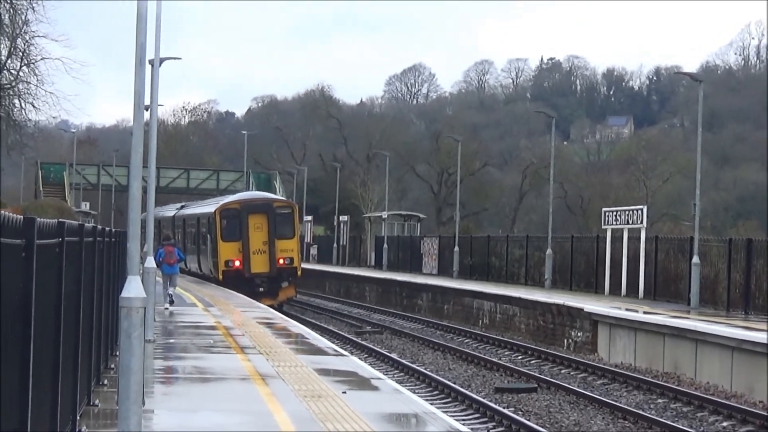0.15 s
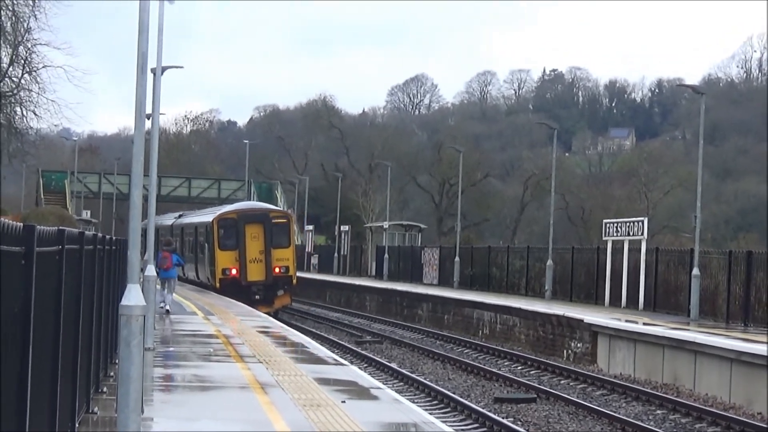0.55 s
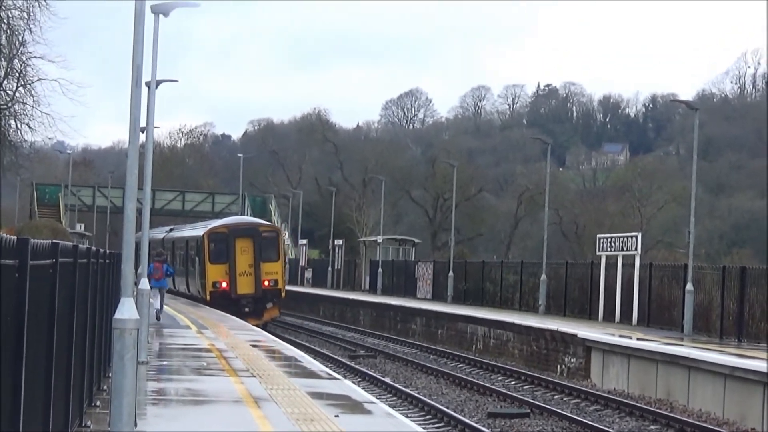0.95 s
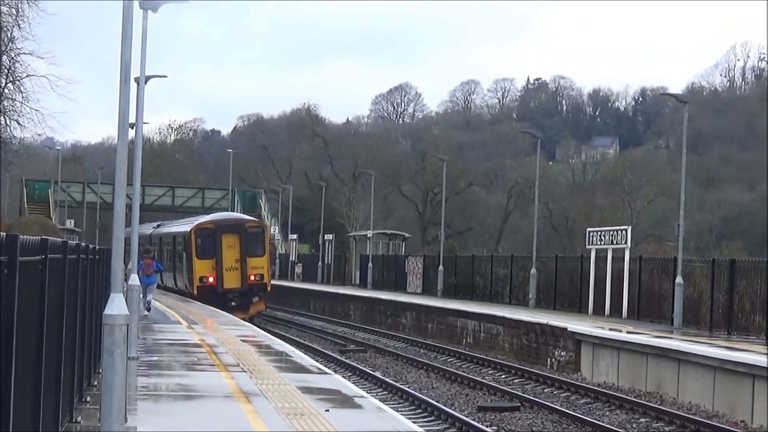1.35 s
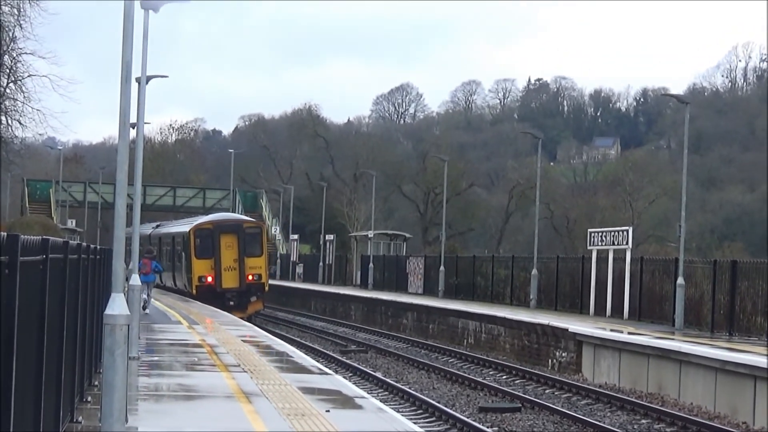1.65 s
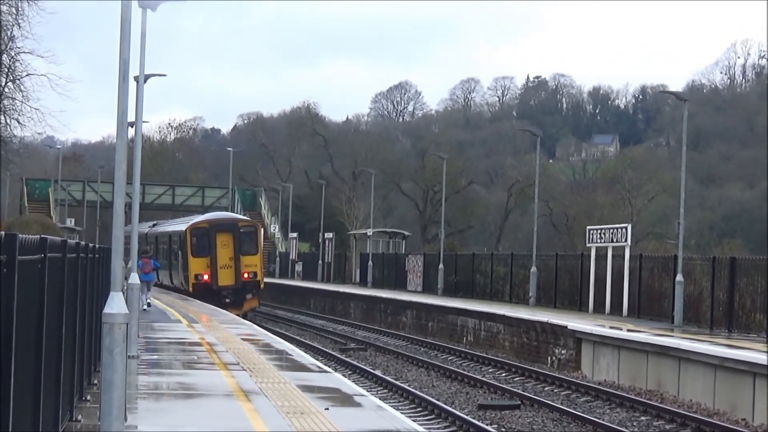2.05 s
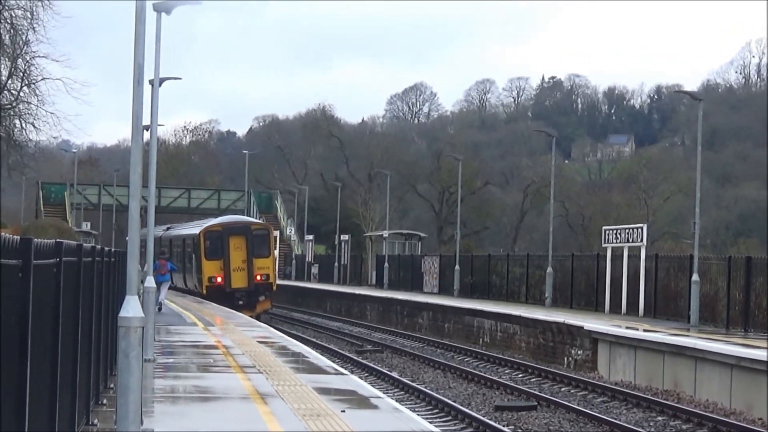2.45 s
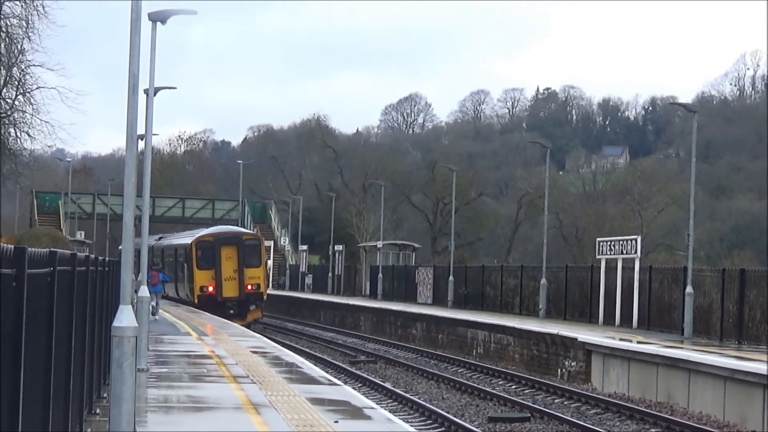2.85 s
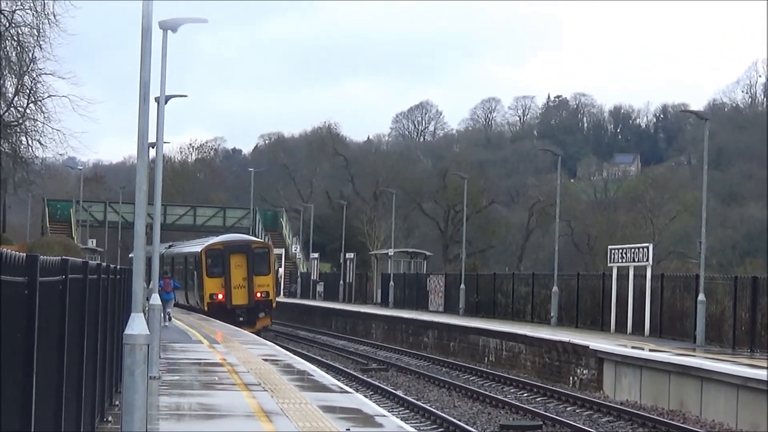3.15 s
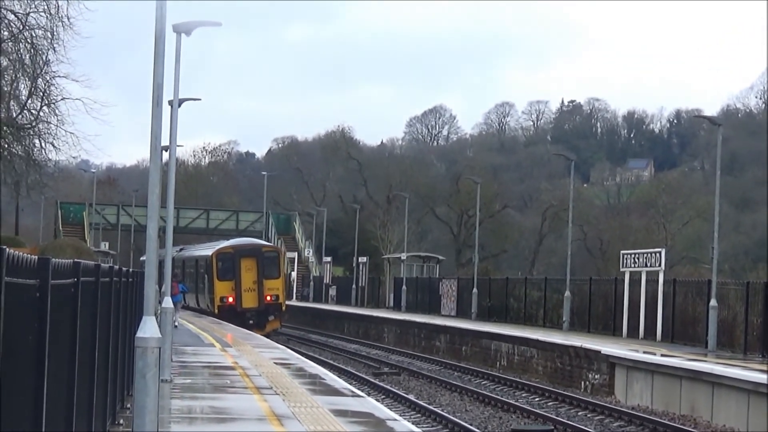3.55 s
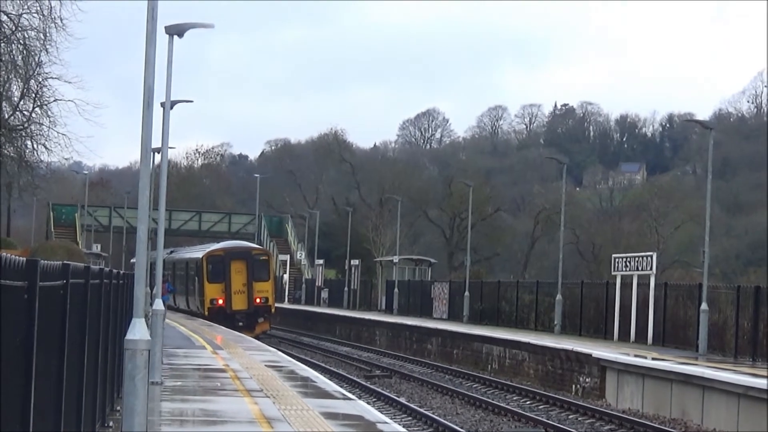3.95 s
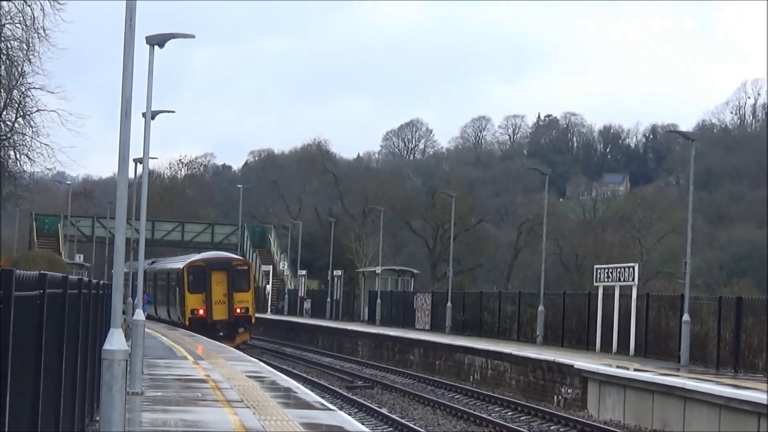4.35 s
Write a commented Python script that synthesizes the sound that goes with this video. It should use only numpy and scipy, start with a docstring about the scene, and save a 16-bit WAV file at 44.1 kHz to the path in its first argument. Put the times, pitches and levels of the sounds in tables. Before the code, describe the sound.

Shrill, wavering train wheel squeals and rough, stuttering brake grinding ring out over a dull rolling rush, with a few close drips.

```python
"""A diesel train's wheels squeal as it brakes along a curved, wet platform, some way ahead of the microphone.
Friction holds three long squeals while other wheel modes catch, swell and ring down. The brakes bite
again and again: each bite chatters, grinds and roughens the long squeals. Behind them is the dull rush of
the running train; close to the stereo microphone, a few drops and soft steps."""
import sys
import numpy as np
from scipy import signal
from scipy.fft import rfft, irfft, next_fast_len
from scipy.io import wavfile
from scipy.ndimage import uniform_filter1d, minimum_filter1d, map_coordinates

SR = 44100
rng = np.random.default_rng(int(sys.argv[2]) if len(sys.argv) > 2 else 0)


def wav_record(signal):
    """Record a signal, one row per channel, as 16-bit PCM in the file named by sys.argv[1]."""
    frames = np.transpose(np.atleast_2d(signal))
    bounded = np.clip(frames, -1, 1)
    # unit amplitude maps onto the largest positive 16-bit level
    quanta = np.round(bounded * 32767).astype(np.int16)
    wavfile.write(sys.argv[1], SR, quanta)


N = 198273

# Contours of the long squeals down the platform: (time [s], level [dB])
MAIN_LEVEL = [(1.2, -60), (1.43, -33.5), (1.83, -19), (1.85, -24), (2.34, -23.5), (2.36, -20.5),
              (2.89, -19), (3.27, -44.5), (3.49, -27), (3.99, -26.5), (4.03, -20), (4.14, -26.5),
              (4.19, -16.5), (4.3, -28.5), (4.36, -17), (4.5, -27.5)]
SHRILL_LEVEL = [(0.7, -55), (0.95, -39), (1.29, -47), (1.53, -38), (2.41, -23.5), (2.55, -13), (2.74, -19),
                (2.77, -14), (2.97, -23), (3.4, -6.5), (3.46, -8), (3.64, -32), (3.8, -34), (3.98, -37),
                (4.01, -31), (4.32, -40), (4.39, -23), (4.5, -30)]
WHISTLE_LEVELS = [
    [(0.45, -62), (0.59, -32), (0.74, -24), (0.93, -30), (1.39, -23.5), (2.5, -31.5), (2.64, -37.5),
     (2.86, -33), (3.28, -43), (3.4, -59)],
    [(3.65, -67), (3.896, -39), (3.946, -48), (4.02, -31.5), (4.176, -32), (4.218, -23), (4.276, -31),
     (4.388, -22), (4.464, -34), (4.496, -31)],
]  # two contours: the whistle sounds twice
# Their slow drift: (time [s], pitch [Hz])
MAIN_DRIFT = [(1.35, 5275), (1.6, 5232), (1.8, 5222), (2.3, 5265), (2.5, 5242), (2.9, 5238), (3.3, 5295),
              (3.6, 5265), (4.5, 5256)]
SHRILL_DRIFT = [(1.95, 10284), (2.55, 10299), (3.15, 10312), (3.4, 10313), (3.8, 10324)]
TWIN_DRIFT = [(0.8, 14361), (1.9, 14369), (4.3, 14428)]  # the lower tone of the whistle
def long_squeals(grind):
    """Friction holds wheel modes singing. Grinding roughens the lower two; the highest is a close pair."""
    rough = grind ** 2 / (grind ** 2 + amp(-45) ** 2)  # half rough at -45 dB of grinding
    main = amp(2.06 + 1.54 * wobble(20))
    main *= sing(curve(MAIN_DRIFT), flutter=.5 + .24 * rough, width_hz=36.5, skirt_hz=231)
    shrill = amp(1.5 + .5 * wobble(12))
    shrill *= sing(curve(SHRILL_DRIFT), flutter=.12 + .38 * rough, width_hz=55, skirt_hz=170)
    whistle = amp(.5 + 2.5 * wobble(18)) * sing(14493, flutter=.21, width_hz=40, skirt_hz=180)
    twin = amp(-5 + 2.2 * wobble(15)) * sing(curve(TWIN_DRIFT), flutter=.38, width_hz=40, skirt_hz=180)
    pair = sum(map(loudness, WHISTLE_LEVELS)) * (whistle + twin)
    return loudness(MAIN_LEVEL) * main + loudness(SHRILL_LEVEL) * shrill + pair


# Wheel modes that come and go on the curve: name -> (pitch [Hz], flutter [0-1], width [Hz])
WHEEL_MODES = { "hoot": (1330, .6, 29), "rub": (1780, .95, 230), "growl": (2440, .6, 29),
               "bray": (2830, .6, 29), "moan": (3095, .52, 38), "upper moan": (3300, .9, 45),
               "rasp": (3830, 1, 70), "low ring": (4090, .65, 25), "yelp": (5995, .7, 40),
               "flare": (6220, 1, 120), "chirp": (7078, .65, 32), "ring": (7962, .65, 45),
               "mid ring": (8410, .9, 30), "high ring": (9148, .85, 25), "high twin": (9348, .9, 25),
               "sizzle": (10490, .95, 35), "low zing": (11272, .8, 40), "zing": (11365, .4, 25),
               "top ring": (15502, .3, 20)}
# Friction catches one: (mode name, time at full level [s], hold [s], level [dB], growth [dB/s])
MODE_CATCHES = [ ("ring", 0.0, 0.051, -32, 200), ("ring", .17, 0.067, -38, 180), ("moan", .05, .5, -53, 50),
                ("chirp", 0.47, .05, -35, 100), ("chirp", 0.5, 0.076, -23, 350),
                ("mid ring", .48, 0.59, -42.5, 200), ("moan", 0.665, 0.058, -37, 800),
                ("upper moan", 0.708, .07, -33.5, 300), ("zing", 0.6, .05, -39, 320),
                ("zing", 0.743, 0.032, -21.5, 270), ("hoot", 0.836, 0.027, -47, 500),
                ("mid ring", 0.908, 0.053, -24, 330), ("zing", 0.904, .03, -24, 400),
                ("moan", 0.91, 0.025, -22, 250), ("low zing", 0.934, .04, -22.5, 180),
                ("ring", 0.95, 0.045, -27, 150), ("bray", 1.05, .03, -40.5, 900),
                ("rub", 1.095, .01, -39, 900), ("rub", 1.31, 0.13, -42.5, 25),
                ("high ring", 1.62, 1.35, -30.5, 95), ("high twin", 1.61, 0.037, -30, 120),
                ("sizzle", 1.67, .55, -33.5, 70), ("mid ring", 1.69, 1.32, -39, 140),
                ("low zing", 1.8, .35, -43, 100), ("sizzle", 2.34, 0.57, -23, 40),
                ("high twin", 2.59, 0.43, -28.5, 22), ("rasp", 2.55, 0.45, -38, 23),
                ("low ring", 2.56, 0.2, -30, 147), ("low zing", 2.545, 0.17, -38, 75),
                ("low ring", 2.785, 0.58, -36.5, 42), ("sizzle", 2.98, 0.089, -30.5, 53),
                ("flare", 3.16, .15, -43, 80), ("flare", 3.6, 0.0096, -32.5, 700),
                ("ring", 3.325, .01, -34.5, 730), ("rasp", 3.32, 0.0091, -38.5, 500),
                ("sizzle", 3.1, 0.14, -23, 400), ("high twin", 3.43, .06, -33, 300),
                ("sizzle", 3.72, 0.11, -28.5, 100), ("chirp", 3.9, 0.074, -27.5, 82),
                ("sizzle", 4.01, 0.6, -26, 480), ("mid ring", 4.03, .47, -28.5, 300),
                ("high twin", 4.04, 0.17, -31, 216), ("growl", 4.7, 0.033, -27, 740),
                ("bray", 4.02, 0.052, -25.5, 1100), ("top ring", 4.2, .1, -45, 38),
                ("low zing", 4.15, .1, -36, 57), ("upper moan", 4.1, 0.26, -34.5, 180),
                ("growl", 4.22, .02, -31, 610), ("yelp", 4.06, 0.09, -32, 300),
                ("yelp", 4.23, .015, -27, 750), ("mid ring", 4.245, .01, -20, 400),
                ("high twin", 4.34, 0.058, -20.5, 560), ("high ring", 4.42, .08, -27, 93),
                ("low zing", 4.45, .05, -28.5, 84)]
def passing_squeals():
    """A mode that friction catches grows exponentially, holds unsteadily and rings down."""
    out = np.zeros(N)
    for name, (hz, flutter, width_hz) in WHEEL_MODES.items():
        swells = [swell(*catch, fall=120) for mode, *catch in MODE_CATCHES if mode == name]
        out += np.max(swells, axis=0) * amp(1.6 * wobble(18)) * sing(hz, flutter, width_hz)
    return out


# One hard flange contact: (time at full level [s], hold [s], level [dB], growth [dB/s], fall [dB/s])
FLANGE_CONTACT = (.908, .04, -25.5, 1000, 260)
# The modes it shakes: (pitch [Hz], relative level [dB], width [Hz])
FLANGE_MODES = [(2990, -2, 65), (4060, -19.5, 24), (5240, -10, 50), (5500, -11, 17), (6040, -2, 80),
                (8060, -0.5, 49), (9230, -3, 200)]
def flange_screech():
    """Out on the curve, a flange hits the rail and shakes several modes at once."""
    modes = sum(amp(db) * sing(hz, flutter=.84, width_hz=width) for hz, db, width in FLANGE_MODES)
    return swell(*FLANGE_CONTACT) * modes


# Brake bites: (time at full grip [s], hold [s], chatter drive [dB], grind drive [dB], slip rate [Hz])
BRAKE_BITES = [(1.625, 0.037, -32, -41.5, 2650), (1.745, 0.053, -34.5, -48.5, 2640),
               (1.84, 0.021, -24, -42.5, 2635), (1.905, 0.016, -25.5, -42, 2530),
               (1.955, 0.028, -28, -40.5, 2640), (2.035, 0.014, -23, -40.5, 2630),
               (2.075, 0.029, -27.5, -41, 2640), (2.13, 0.027, -26, -41, 2550),
               (2.22, 0.027, -26.5, -41, 2650), (2.265, 0.072, -19.5, -39.5, 2640),
               (2.36, 0.032, -21.5, -38, 2620), (2.44, .19, -17, -36, 2619),
               (2.655, 0.042, -19.5, -35.5, 2604), (2.735, 0.034, -19, -35, 2600),
               (2.8, 0.029, -24.5, -36, 2580), (2.88, 0.022, -25.5, -40, 2645),
               (2.93, 0.024, -20.5, -37.5, 2634), (3.435, 0.084, -24.5, -38.5, 2607),
               (3.53, 0.021, -20.5, -44.5, 2637), (3.58, 0.075, -23, -45.5, 2657),
               (3.69, 0.041, -23.5, -46, 2640), (3.75, 0.058, -26, -44, 2650),
               (3.91, 0.021, -34, -38, 2654), (4.0, 0.071, -22.5, -32, 2625),
               (4.09, 0.17, -39.5, -29.5, 2643), (4.28, .07, -42, -38.5, 2620),
               (4.355, .145, -23.5, -28, 2620)]
def brake_friction():
    """Chatter drive, grind drive and slip rate: each bite grabs fast, holds and lets go."""
    chatter = np.zeros(N)
    grind = swell(1.58, hold=N / SR, db=-50.5, growth=81, fall=0)  # light drag between bites
    slip_hz = np.full(N, float(BRAKE_BITES[0][-1]))
    for time, hold, chatter_db, grind_db, hz in BRAKE_BITES:
        bite = swell(time, hold, db=0, growth=1198, fall=350.5)
        slip_hz = np.where(amp(chatter_db) * bite > chatter, hz, slip_hz)  # the strongest sets the rate
        chatter = np.maximum(chatter, amp(chatter_db) * bite)
        grind = np.maximum(grind, amp(grind_db) * bite)
    return chatter, grind, slip_hz


def brake_chatter(drive, rate_hz):
    """The brake sticks and slips at an unsteady rate: a rough tone with a strong third harmonic."""
    force = drive * amp(2.5 * wobble(45))
    slip_hz = rate_hz * (1 + .006 * wobble(40))
    first = amp(-9.5) * sing(slip_hz, flutter=.87, width_hz=130, skirt_hz=477)
    third = sing(3 * slip_hz, flutter=.9, width_hz=65, skirt_hz=500)
    # the slips also shake a low mode in fits
    low = amp(-27.5 + 3.5 * wobble(22)) * sing(1960, flutter=.99, width_hz=52)
    return force * (first + third + low)


# Resonances of wheel and brake rigging: (frequency [Hz], width [Hz], relative level [dB])
STEEL_MODES = [(760, 50, -24), (1950, 60, -17), (2250, 34, -12), (2440, 34, -3), (2620, 50, -9),
               (2830, 49, 0), (3320, 19, -3), (3800, 50, -11), (3913, 24, 0), (4470, 50, -13),
               (4690, 45, -11), (4990, 33, -7), (5660, 60, -8), (5995, 26, 1), (6420, 40, -14),
               (6640, 27, -11), (6850, 70, -11), (7085, 26, -9), (7451, 22, -2), (8020, 60, -1),
               (9000, 74, -11), (12330, 50, -13)]
# The brake scraping the wheel: (frequency [Hz], relative level [dB])
SCRAPE_SPECTRUM = [(700, -32), (1500, -18), (2100, -9), (2700, 1), (3500, -6), (4600, -1), (6300, -3),
                   (7700, 4), (9500, -1), (10800, -8), (11800, -9), (13400, -18), (14200, -32),
                   (15800, -42)]
def brake_grind(drive, ring_db, scrape_db):
    """Dense tiny slips scrape the wheel and ring all its modes at once; a harder bite rings more."""
    def steel(f):
        return sum(amp(db) / (1 + ((f - hz) / (.79 * width)) ** 2) for hz, width, db in STEEL_MODES)

    slips = rng.standard_normal((2, N)) * amp(1.5 * wobble(500))
    pressure = drive * amp(1.1 * wobble(50))
    hard_bite_db, extra_ring_db_per_db = -22.5, .36
    ring = unit(filtered(slips[0], steel)) * (drive / amp(hard_bite_db)) ** extra_ring_db_per_db
    scrape = unit(coloured(slips[1], SCRAPE_SPECTRUM))
    return pressure * (amp(ring_db) * ring + amp(scrape_db) * scrape)


# Drops, finer drops and steps (most at a walking pace) beside the microphone: (time [s], level [dB])
DROP_TAPS = [(0.123, -14.5), (0.161, -20), (1.074, -11), (1.083, -7), (1.538, 13), (2.827, -2)]
DROP_TICKS = [(.523, -6), (1.191, 3.5), (1.815, 0.5)]
STEP_THUDS = [(0.288, -16), (.91, -9), (1.074, -14), (1.21, -16), (1.425, -17), (1.538, -27),
              (2.151, -14.5), (2.769, -13), (3.367, -17), (3.965, -18)]
# The colour of each: (frequency [Hz], relative level [dB])
TAP_SPECTRUM = [(60, -40), (200, -23), (700, -11), (1500, -1), (2300, -4), (3000, 0), (4800, -10),
                (6300, -4), (9000, -14), (13000, -18), (16000, -40)]
TICK_SPECTRUM = [(500, -24), (4500, -25), (7300, 6), (9700, 4.5), (12000, -21), (16000, -37)]
THUD_SPECTRUM = [(60, -35), (130, -16), (230, 0), (700, -3), (1500, -14), (6000, -35)]
def drops_and_steps():
    """Close by on the wet platform, drops tap and tick and feet thud softly."""
    hits = [(time, amp(db) * impact(TAP_SPECTRUM, tail_db=-4, t60=.014)) for time, db in DROP_TAPS]
    hits += [(time, amp(db) * impact(TICK_SPECTRUM, tail_db=4, t60=.014)) for time, db in DROP_TICKS]
    hits += [(time, amp(db) * impact(THUD_SPECTRUM, tail_db=29, t60=.034)) for time, db in STEP_THUDS]
    out = np.zeros(N + SR)
    for time, hit in hits:
        out[round(time * SR):][:len(hit)] += hit
    return out[:N]


# The rush of the train from some way off: (frequency [Hz], relative level [dB])
RUSH_SPECTRUM = [(15, -65), (25, -43), (227, -11), (368, -6), (598, -6), (826, -3.5), (1490, -9),
                 (1660, -8.5), (1850, -7.5), (2770, -9.5), (3170, -8), (6550, -13), (7910, -10),
                 (9050, -12), (15500, -38)]
# Diesel engine tones: (pitch [Hz], level [dB])
ENGINE_TONES = [(70.0, -74.5), (366.1, -60)]
def running_train():
    """Engine hum and the steady rush of rolling wheels, behind the squeals."""
    rush = amp(-40 + .58 * wobble(12)) * unit(coloured(rng.standard_normal(N), RUSH_SPECTRUM))
    hum = sum(amp(db) * sing(hz, flutter=.78, width_hz=6.6, skirt_hz=30) for hz, db in ENGINE_TONES)
    return rush + hum


def platform_echoes(direct, t60):
    """Platform and fences scatter the sound into a short tail, 60 dB down after t60 seconds."""
    t = np.arange(SR // 8) / SR
    scatter = rng.standard_normal(len(t)) * amp(-60 * t / t60)
    return signal.fftconvolve(direct, scatter / np.linalg.norm(scatter))[:N]


# Diffuse sound at the microphone: (frequency [Hz], side level relative to mid [dB])
SIDE_SPECTRUM = [(60, -32), (250, -22), (600, -10), (1200, -1.5), (2500, -10), (5000, -8.5), (10000, -27)]
# How far the left port leads the right: (frequency [Hz], phase [rad]); negative is a lag
LEFT_LEAD = [(60, -0.11), (150, -0.16), (430, -1.13), (1030, -0.7), (4200, -0.58), (5340, -0.43),
             (7060, -0.41), (10300, -0.25), (14500, -0.14)]
def stereo_microphone(mid, diffuse):
    """Two ports pick up the same wave slightly out of phase; diffuse sound adds width."""
    def port_phases(hz):
        return np.exp(.5j * np.outer([1, -1], along(LEFT_LEAD, hz)))

    side = coloured(diffuse, SIDE_SPECTRUM)
    balance = amp([[.15], [-.15]])
    return filtered(np.array([mid + side, mid - side]), port_phases) * balance


def sing(pitch_hz, flutter, width_hz, skirt_hz=400):
    """A self-excited mode of rms 1: a clean line, plus sidebands from uneven slip and many echo paths."""
    size = next_fast_len(N)
    offset = np.fft.fftfreq(size, 1 / SR)
    shape = 1 / ((1 + 1j * offset / width_hz) * (1 + 1j * offset / skirt_hz) ** 2)
    white = rng.standard_normal(size) + 1j * rng.standard_normal(size)
    sidebands = unit(np.fft.ifft(shape * white)[:N])
    swing = np.sqrt(1 - flutter ** 2) + flutter * sidebands
    # friction feeds the mode at a steady mean power, however it beats
    swing /= np.sqrt(np.abs(uniform_filter1d(np.abs(swing) ** 2, size=SR // 16)) + 1e-9)
    phase = 2 * np.pi * np.cumsum(pitch_hz * np.ones(N)) / SR
    return np.sqrt(2) * np.real(swing * np.exp(1j * phase))


def impact(spectrum, tail_db, t60):
    """A sharp blow of unit energy with the given colour and a short scattered tail."""
    size = 4096
    cepstrum = irfft(np.log(amp(along(spectrum, np.fft.rfftfreq(size, 1 / SR)))))
    cepstrum[1:size // 2] *= 2  # minimum phase: the energy comes at the start
    cepstrum[size // 2 + 1:] = 0
    body = irfft(np.exp(rfft(cepstrum)))
    tail = rng.standard_normal(size) * amp(-60 * np.arange(size) / SR / t60)
    blow = amp(tail_db) * tail / np.linalg.norm(tail)
    blow[0] += 1
    hit = signal.fftconvolve(blow, body)[:size]
    return hit / np.linalg.norm(hit)


def swell(time, hold, db, growth, fall):
    """Gain that reaches db at the given time, holds, and dies away; slopes in dB per second."""
    t = np.arange(N) / SR
    return amp(db - abs(growth) * np.maximum(time - t, 0) - abs(fall) * np.maximum(t - time - hold, 0))


def loudness(rows):
    """Gain from (time [s], level [dB]) points, falling 300 dB a second outside their times."""
    t = np.arange(N) / SR
    outside = np.abs(t - np.clip(t, rows[0][0], rows[-1][0]))
    return amp(curve(rows) - 300 * outside)


def curve(rows):
    """(time [s], value) points, interpolated per sample."""
    return np.interp(np.arange(N) / SR, *np.transpose(rows))


def wobble(rate):
    """A smooth random curve, rate knots a second."""
    knots = rng.standard_normal(int(N * rate / SR) + 4)
    return map_coordinates(knots, [np.arange(N) * rate / SR])


def along(points, hz):
    """(frequency [Hz], value) points, interpolated on a log axis."""
    frequencies, values = np.transpose(points)
    return np.interp(np.log(hz + 1), np.log(frequencies + 1), values)


def filtered(x, response):
    """Pass x through a response given as a function of frequency."""
    size = next_fast_len(N + SR // 2)
    return irfft(rfft(x, size) * response(np.fft.rfftfreq(size, 1 / SR)), size)[..., :N]


def coloured(x, spectrum):
    """Shape x with (frequency [Hz], level [dB]) points."""
    return filtered(x, lambda hz: amp(along(spectrum, hz)))


def amp(db):
    """Decibels to gain."""
    return 10 ** (np.asarray(db) / 20)


def unit(x):
    """Scale to rms 1."""
    return x / np.sqrt(np.mean(np.abs(x) ** 2) + 1e-20)


def scene():
    """From the platform, the train is off to one side; echoes and part of the rush are diffuse."""
    chatter, grind, slip_hz = brake_friction()
    squeals = long_squeals(grind) + passing_squeals() + flange_screech()
    brakes = brake_chatter(chatter, slip_hz) + brake_grind(grind, ring_db=11.5, scrape_db=9.5)
    direct = squeals + brakes + drops_and_steps()
    echoes = platform_echoes(direct, t60=.089)
    return stereo_microphone(mid=direct + running_train(), diffuse=echoes + running_train())


def record(dry):
    """Behind the microphone, the camera's fast limiter holds down peaks; its band limit cuts the top."""
    ceiling, top_hz, window = .99, 15800, SR // 1000
    needed = ceiling / np.maximum(np.abs(dry).max(axis=0), ceiling)
    gain = uniform_filter1d(minimum_filter1d(needed, size=window), size=window)
    return filtered(dry * gain, lambda hz: hz < top_hz)


dry = scene()
out = record(dry)
wav_record(out)
```